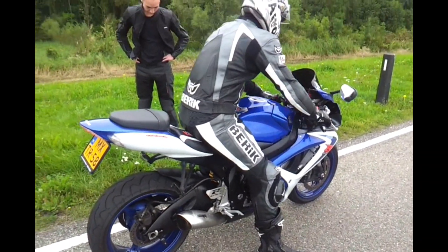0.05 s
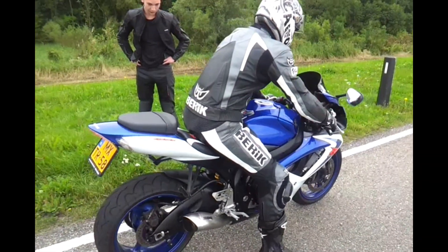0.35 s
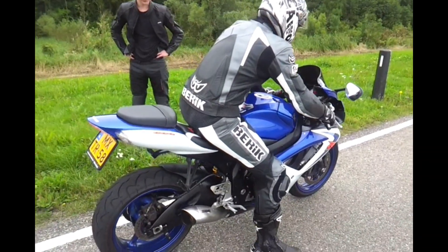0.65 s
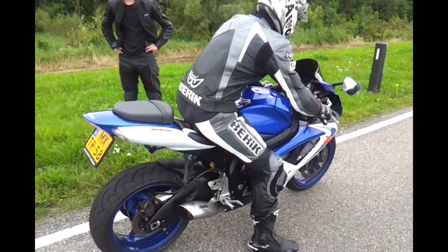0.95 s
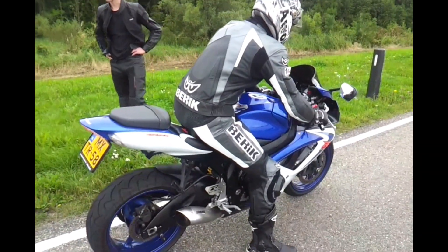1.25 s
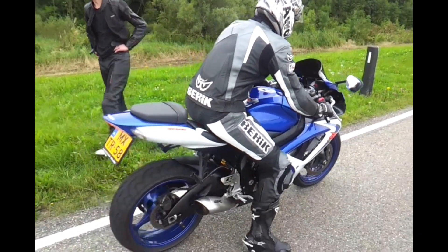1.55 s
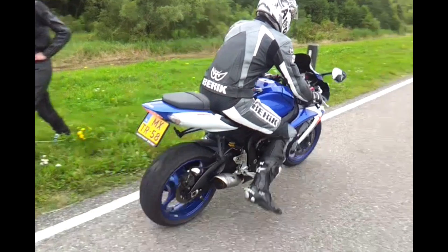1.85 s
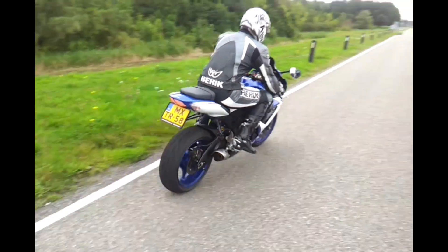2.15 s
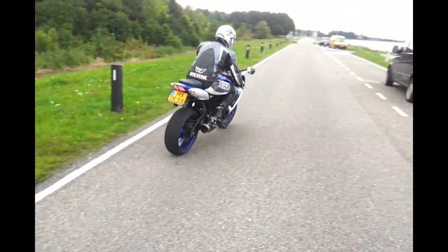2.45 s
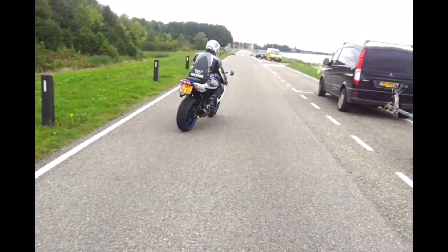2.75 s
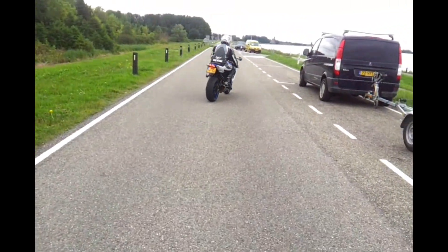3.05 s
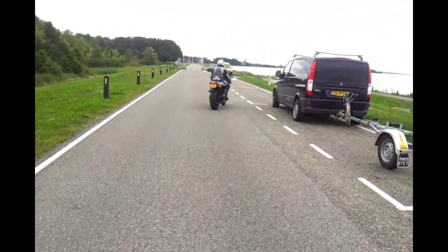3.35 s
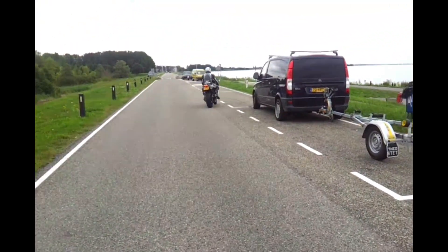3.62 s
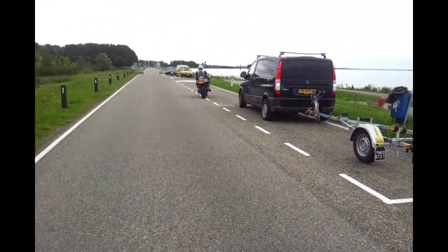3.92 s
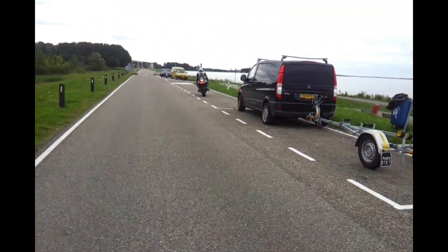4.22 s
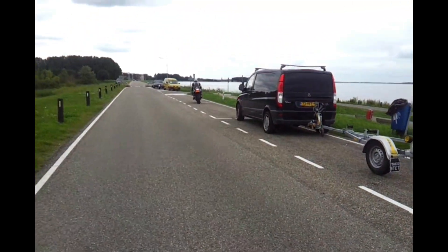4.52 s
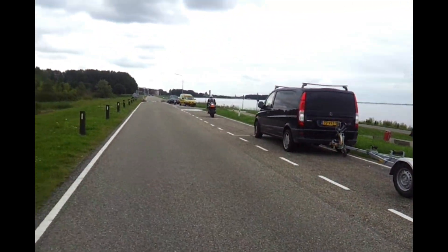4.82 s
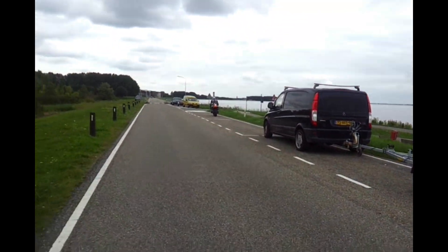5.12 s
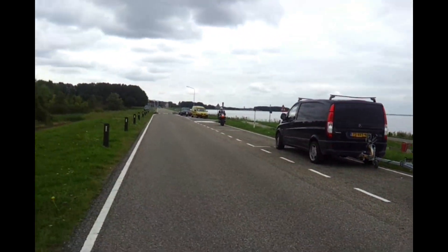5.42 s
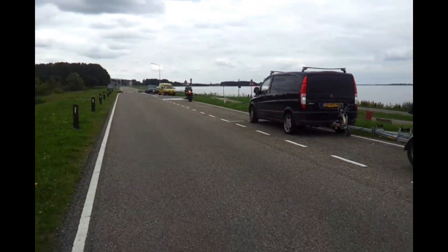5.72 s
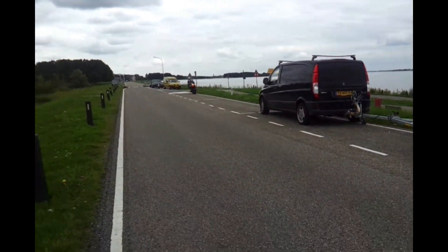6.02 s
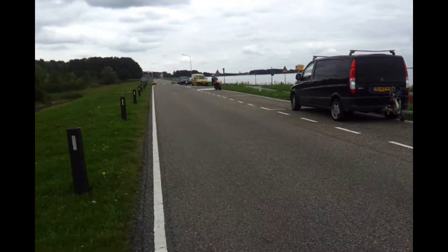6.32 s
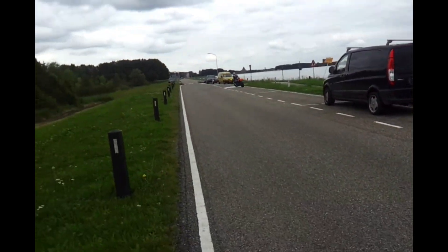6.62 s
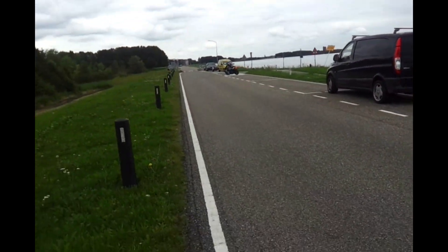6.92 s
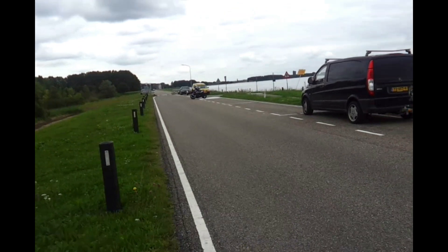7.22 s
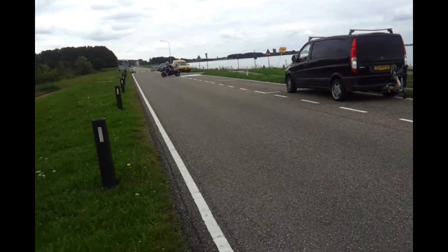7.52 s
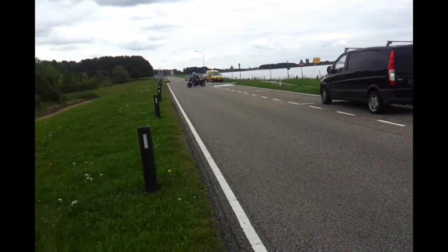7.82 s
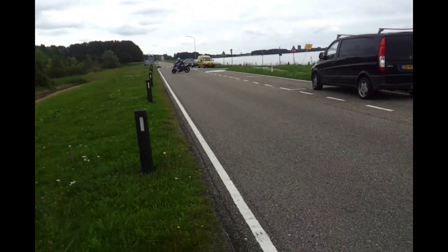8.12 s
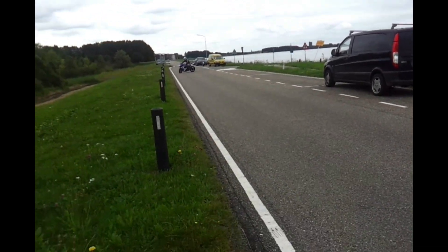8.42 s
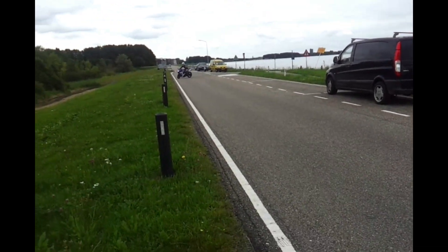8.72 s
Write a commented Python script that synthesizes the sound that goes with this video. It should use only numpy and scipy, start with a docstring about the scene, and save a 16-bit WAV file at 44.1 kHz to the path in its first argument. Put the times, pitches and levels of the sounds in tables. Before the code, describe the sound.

A four-cylinder sport motorcycle idles close to the microphone on an open road. It clunks into gear, revs twice quickly and pulls away, its exhaust overloading into a harsh rasp. The engine eases, pushes once more, then sinks to idle in uneven surges as the bike rolls into the distance. A faint, muffled idle remains, with a thin whine, soft grass rustles and a murmur of far traffic.

```python
"""First you hear a four-cylinder sport motorcycle idling close by, over a faint murmur of traffic.
It clunks into gear, revs twice and pulls away down an open road. Then the throttle shuts, the engine
sinks to idle in uneven surges and the bike rolls on into the distance.
Each firing of a cylinder sends a pulse of gas that makes the exhaust pipe ring, while the engine's
moving parts hiss, clatter and whine. Close up, the exhaust overloads the microphone into a rasp."""
import sys
import numpy as np
from scipy import signal
from scipy.fft import rfft, irfft
from scipy.io import wavfile
from scipy.ndimage import uniform_filter1d

SR = 44100
rng = np.random.default_rng(int(sys.argv[2]) if len(sys.argv) > 2 else 0)


def output_pcm(signal):
    """Save a mono or channel-first signal as 16-bit PCM at the path in sys.argv[1].

    Samples are clipped to [-1, 1] before scaling.
    """
    pcm = np.clip(np.atleast_2d(signal).T, -1, 1) * 32767
    wavfile.write(sys.argv[1], SR, np.round(pcm).astype(np.int16))


N = 395136
TIME = np.arange(N) / SR


def from_db(db):
    """Turn decibels into a number to multiply by."""
    return 10 ** (np.asarray(db) / 20)


def rms_one(x):
    """Scale a signal so that its average strength (rms) is 1."""
    return x / np.sqrt(np.mean(x ** 2) + 1e-20)


def in_time(rows):
    """Join (time, value) points with straight lines."""
    return np.interp(TIME, *np.transpose(rows))


def swells(events):
    """A loudness curve with a smooth rise and fall for each event."""
    return sum(from_db(db) * np.exp(-((TIME - s) / half_length) ** 2) for s, db, half_length in events)


def low_pass(x, hz, order):
    """Dull a sound above hz; a higher order cuts more steeply."""
    return signal.sosfilt(signal.butter(order, min(hz, .45 * SR), fs=SR, output="sos"), x)


def noise(colour):
    """Noise of strength 1; its colour says how strong each frequency is."""
    hz, db = np.transpose(colour)
    grid_hz = np.maximum(np.arange(N // 2 + 1) * SR / N, 1)
    gain = from_db(np.interp(np.log(grid_hz), np.log(hz), db))
    return rms_one(irfft(rfft(rng.standard_normal(N)) * gain, N))


def wobble(hz):
    """A random wander of strength 1, mostly slower than hz."""
    return rms_one(low_pass(rng.standard_normal(N), hz, order=2))


def resonate(x, tones):
    """Make a sound ring at each tone; narrower tones ring longer."""
    out = np.zeros(N)
    for hz, width, db in tones:
        r = np.exp(-np.pi * width / SR)
        poles = [1, -2 * r * np.cos(2 * np.pi * hz / SR), r * r]
        out += from_db(db) * (1 - r * r) / 2 * signal.lfilter([1, 0, -1], poles, x + 1e-18)
    return out


# colour of far traffic: (frequency [Hz], relative level [dB])
TRAFFIC_COLOUR = [(40, 2.5), (100, -1.5), (300, 5.5), (500, -21), (620, 5), (760, -12), (1100, -24),
                  (2500, -27)]

def traffic():
    """Far traffic blends into a steady murmur."""
    return from_db(-41) * noise(TRAFFIC_COLOUR)


# colour of hiss, for both grass and engine: (frequency [Hz], relative level [dB])
HISS_COLOUR = [(100, 2), (400, 4), (800, 0.5), (1250, -2), (1800, -14.5), (2300, -6), (2900, -7),
               (3450, -3.5), (4700, -5.5), (5400, -5), (6200, -1.5), (8000, -16.5)]
# soft rustles nearby: (time [s], level [dB], half length [s])
RUSTLES = [(5.15, -51, .25), (5.95, -52, .12), (7.15, -43.5, 0.16), (7.8, -46, 0.15), (8.4, -47.5, 0.19),
           (8.9, -58, 0.072)]

def grass():
    """Air in the grass makes a faint hiss with a few rustles."""
    return (from_db(-48.5) + swells(RUSTLES)) * noise(HISS_COLOUR)


# a puff of wind: (time [s], level [dB], half length [s])
GUST = [(8.08, -34, .11)]
# colour of the wind: (frequency [Hz], relative level [dB])
WIND_COLOUR = [(25, -26), (60, -1), (110, 4.5), (220, -6), (500, -42), (2000, -76)]

def wind():
    """Wind on the microphone makes a short, low rumble."""
    return swells(GUST) * noise(WIND_COLOUR)


# small clicks at the roadside: (time [s], level [dB], fade time [s])
ROADSIDE_CLICKS = [(5.048, -36, 0.005), (5.151, -32.5, 0.0042), (6.421, -27.5, 0.0045),
                   (6.569, -33, 0.0035)]
# clunks as first gear goes in: (time [s], level [dB], fade time [s])
GEAR_CLUNKS = [(.909, -2.5, 0.012), (.919, -6.5, 0.022), (.979, -7, 0.018), (1.072, -13, 0.033),
               (1.091, -30, 0.01), (1.143, -10, 0.013)]
# colour of both: (frequency [Hz], relative level [dB])
HIT_COLOUR = [(300, -20), (1200, -4.5), (2800, 0.5), (4500, 1), (6200, 1), (8000, -8)]

def hard_hits(events):
    """Hard things strike each other with a bright burst that dies quickly."""
    loudness = np.zeros(N)
    for s, db, fade_s in events:
        start = round(s * SR)
        loudness[start:] += from_db(db) * np.exp(-np.minimum(TIME[:N - start] / fade_s, 20))
    return loudness * noise(HIT_COLOUR)


# how fast the engine runs: (time [s], speed [firings per s])
ENGINE_SPEED = [(0.0, 55.2), (0.85, 52.1), (1.1, 53.2), (1.12, 57.1), (1.2, 119.0), (1.27, 140.2),
                (1.35, 109.6), (1.39, 123.2), (1.42, 118.6), (1.47, 148.4), (1.57, 178.4), (1.65, 232.7),
                (1.72, 262.0), (1.77, 249.3), (1.85, 194.3), (1.9, 186.9), (2.09, 219.3), (2.29, 219.2),
                (2.44, 203.7), (2.72, 164.0), (2.92, 125.9), (3.27, 143.8), (3.49, 149.5), (3.62, 135.2),
                (3.74, 114.5), (4.39, 59.9), (4.49, 55.3), (4.64, 53.1), (8.24, 52.7), (8.96, 54.4)]
# two quick revs, pulling away, easing, a second push, then shut: (time [s], opening [0-1])
THROTTLE = [(1.11, 0), (1.17, .4), (1.279, 0.98), (1.303, 0), (1.386, 0.53), (1.406, 0), (1.46, 0.86),
            (1.72, 0.2), (2.201, 1), (2.702, 1), (2.95, 0.71), (3.508, 0.83), (3.528, 0)]
# how far away the bike is: (time [s], distance [m])
DISTANCE = [(1.7, 0.98), (2.301, 3.16), (3.001, 5.25), (3.601, 12.1), (4.502, 12.3), (6.3, 18.8), (8.1, 23)]
IDLE_HZ = 53

def riding():
    """The ride: engine speed in octaves above idle, throttle opening, and doublings of distance."""
    octaves = np.log2(in_time(ENGINE_SPEED) / IDLE_HZ)
    metres = in_time(DISTANCE)
    return octaves, in_time(THROTTLE), np.log2(metres / metres[0])


def crank(ride):
    """Count the firings so far; the flywheel smooths speed changes, and the idle wanders a little."""
    octaves, _, _ = ride
    speed = uniform_filter1d(in_time(ENGINE_SPEED), size=900, mode="nearest")
    wander = .004 * wobble(hz=2.003) * np.clip(1 - octaves, 0, 1)
    return np.cumsum(speed * (1 + wander)) / SR + .5


def part_db(levels, ride):
    """A part of the bike gets louder with speed and throttle, and quieter with distance."""
    idle_db, speed_db, throttle_db, distance_db = levels
    octaves, throttle, doublings = ride
    return idle_db + speed_db * octaves + throttle_db * throttle - distance_db * doublings


# loudness of the hiss and of the clatter: (level at idle close by [dB], rise per octave of speed [dB],
# rise at full throttle [dB], drop per doubling of distance [dB])
HISS_LEVELS = (-22, 10.5, 8, 6)
CLATTER_LEVELS = (-26, 7, 5, 5)
# ringing tones of the engine cases: (pitch [Hz], width [Hz], relative level [dB])
CASE_TONES = [(920, 250, -3.5), (1642, 200, -1), (1823, 55, 0)]

def machinery(puff, ride):
    """Valves, chain and gas hiss, and valve knocks ring the cases; both throb with the firings."""
    hiss = rms_one(noise(HISS_COLOUR) * (1 + 0.16 * puff))
    hardness = from_db(1.5 * wobble(hz=35))   # no two knocks are equally hard
    knocks = rng.standard_normal(N) * (1 + 0.36 * puff) * hardness
    clatter = rms_one(low_pass(resonate(knocks, CASE_TONES), 1850, order=4))
    return from_db(part_db(HISS_LEVELS, ride)) * hiss + from_db(part_db(CLATTER_LEVELS, ride)) * clatter


# the whine comes and goes at idle: (time [s], level [dB], half length [s])
WHINES = [(.4, -59, 1), (5.1, -46.5, 0.76), (6.3, -52, 0.38), (8.05, -51, 0.13), (8.75, -45.5, 0.061)]

def gear_whine(fired):
    """Gear teeth meet in step with the engine and sing a thin, wavering note."""
    teeth_per_firing = 30.25
    waver = 1 + 0.16 * wobble(hz=13)
    return swells(WHINES) * np.sin(2 * np.pi * teeth_per_firing * fired) * waver


def burning(ride):
    """Fuel burns smoothly under load, but misfires as a starved engine runs down."""
    octaves, throttle, _ = ride
    starved = np.clip(1 - throttle / .4, 0, 1)
    misfire = starved * np.exp(-((octaves - .74) / .57) ** 6)   # only part-way down to idle
    roughness = .05 * (1 - starved) + .08 * starved + .8 * misfire
    return roughness, misfire


# the four cylinders in firing order: (extra strength [share of uneven_db])
CYLINDERS = [0.48, 0.06, 0.52, -0.05]

def firing_pulses(fired, throttle, roughness):
    """One pulse per firing; the cylinders differ, and rough burns stray in strength and timing."""
    starts = np.flatnonzero(np.diff(np.floor(fired)))
    size_stray, time_stray = rng.standard_normal((len(starts), 2)).T * roughness[starts]
    uneven_db = 4.05 + 5.5 * throttle[starts]
    size = from_db(uneven_db * np.resize(CYLINDERS, len(starts)) - 1.5 * size_stray)
    position = np.interp(np.floor(fired[starts + 1]) + 0.099 * time_stray, fired, np.arange(N))
    # each pulse is shared between the two nearest samples
    sample, fraction = np.minimum(position.astype(int), N - 2), position % 1
    pulses = np.zeros(N)
    pulses[sample] += size * (1 - fraction)
    pulses[sample + 1] += size * fraction
    return pulses


def turning(pipe, at_s, half_length_s):
    """Far off the bike turns round, and its own body muffles the pipe."""
    away = .5 + .5 * np.tanh((TIME - at_s) / half_length_s)
    muffled = signal.sosfiltfilt(signal.butter(2, 270, fs=SR, output="sos"), pipe)
    return (1 - away) * pipe + away * muffled


MIC_HEIGHT_M, PIPE_HEIGHT_M, SOUND_M_PER_S = 1.355, 0.4157, 343

def road_echo(pipe):
    """Sound bounces off the road; the echo follows more closely as the bike leaves."""
    metres = in_time(DISTANCE)
    direct_m = np.hypot(metres, MIC_HEIGHT_M - PIPE_HEIGHT_M)
    bounced_m = np.hypot(metres, MIC_HEIGHT_M + PIPE_HEIGHT_M)
    delay_s = (bounced_m - direct_m) / SOUND_M_PER_S
    return 0.45 * np.interp(TIME - delay_s, TIME, pipe)


def silencer(x, hz, width_hz):
    """The chambers delay the low part of each pulse, so it swells before it dies."""
    r = np.exp(-np.pi * width_hz / SR)
    poles = [1, -2 * r * np.cos(2 * np.pi * hz / SR), r * r]
    return signal.lfilter(poles[::-1], poles, x + 1e-18)


# low boom of pipe and silencer:
# (pitch [Hz], width [Hz], relative level [dB], change per doubling of distance [dB])
BOOM_TONES = [(54.2, 15, -2.5, -0.3), (109.5, 12, 4, -4.6), (171.1, 40, 9, 0.9), (213.3, 55.3, 14, -3),
              (260.4, 51, -1.5, 1.77), (329.4, 34, -4.5, 2.67)]
# higher bark of the pipe: (pitch [Hz], width [Hz], relative level [dB])
BARK_TONES = [(498.2, 21, -9), (636, 136, -5), (742.4, 72, -1.5), (1018, 44, -29.5), (1397, 410, -12)]
# loudness of the bark next to the boom: same columns as HISS_LEVELS
BARK_LEVELS = (-15.5, 10.5, 5, 0.6)

def ringing_pipe(pulses, puff, ride):
    """Gas pulses ring the pipe; speed and throttle wake the bark, and distance recolours the boom."""
    _, _, doublings = ride
    gas = pulses + from_db(-48.5) * puff * rng.standard_normal(N)   # swirling gas adds a little noise
    boom = sum(from_db(change_db * doublings) * resonate(gas, [tone]) for *tone, change_db in BOOM_TONES)
    boom = silencer(low_pass(boom, 391.7, order=4), hz=171.5, width_hz=130)
    bark = low_pass(resonate(gas, BARK_TONES), 1187, order=4)
    return boom + from_db(part_db(BARK_LEVELS, ride)) * bark


# loudness of the exhaust: same columns as HISS_LEVELS
EXHAUST_LEVELS = (-3.91, 8.5, 13.5, 5)
# surges after the throttle shuts: (time [s], boost [dB])
SURGES = [(3.85, 7), (3.925, 7), (3.991, 6.5), (4.063, 7), (4.146, 9.5), (4.243, 9.5), (4.386, 6.5)]
SURGE_HALF_LENGTH_S, MISFIRE_DROP_DB = 0.016, 6.5

def exhaust(fired, puff, ride):
    """The bike's main voice: the pipe and its echo, weaker during misfires but with short surges."""
    _, throttle, _ = ride
    roughness, misfire = burning(ride)
    pulses = firing_pulses(fired, throttle, roughness)
    pipe = turning(ringing_pipe(pulses, puff, ride), at_s=7.26, half_length_s=0.51)
    heard = pipe + road_echo(pipe)
    # even out the loudness first, so that level_db alone sets it
    power = uniform_filter1d(uniform_filter1d(heard ** 2, size=2500), size=1700)
    even = heard / np.sqrt(np.abs(power) + 1e-20)
    surge_db = sum(db * np.exp(-((TIME - s) / SURGE_HALF_LENGTH_S) ** 2) for s, db in SURGES)
    level_db = part_db(EXHAUST_LEVELS, ride) - MISFIRE_DROP_DB * misfire + surge_db
    return from_db(level_db) * even


def scene():
    """The bike and the roadside around it, in one channel."""
    ride = riding()
    fired = crank(ride)
    puff = np.exp(-4.0 * (fired % 1))   # gas rushes out as each valve opens, then ebbs
    bike = exhaust(fired, puff, ride) + machinery(puff, ride) + gear_whine(fired) + hard_hits(GEAR_CLUNKS)
    roadside = grass() + traffic() + hard_hits(ROADSIDE_CLICKS) + wind()
    return (bike + roadside)[None]


def record(dry):
    """The overloaded microphone flattens loud peaks into a rasp, and the highest treble is cut."""
    rasp = np.clip(dry, -0.62, 0.62)
    gentle_cut = signal.butter(5, 7700, fs=SR, output="sos")
    steep_cut = signal.cheby2(8, 24, 9000, fs=SR, output="sos")
    dulled = signal.sosfiltfilt(np.vstack([gentle_cut, steep_cut]), rasp)
    # the filters overshoot, and flattening those peaks again adds a faint sizzle
    sizzling = np.clip(dulled, -0.704, 0.704)
    return low_pass(sizzling, 15800, order=16)


dry = scene()
out = record(dry)
output_pcm(out)
```